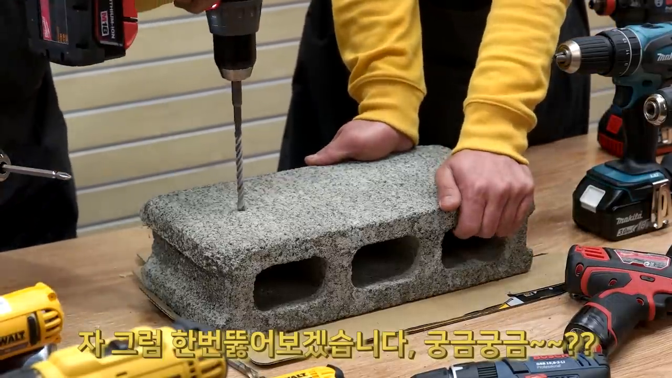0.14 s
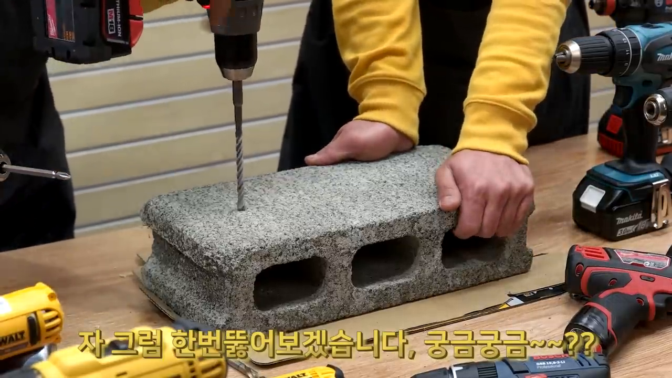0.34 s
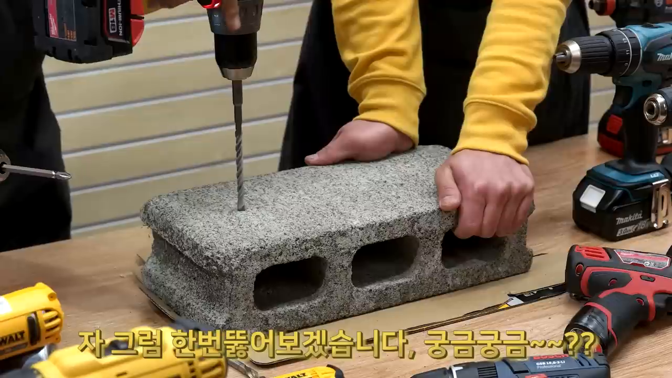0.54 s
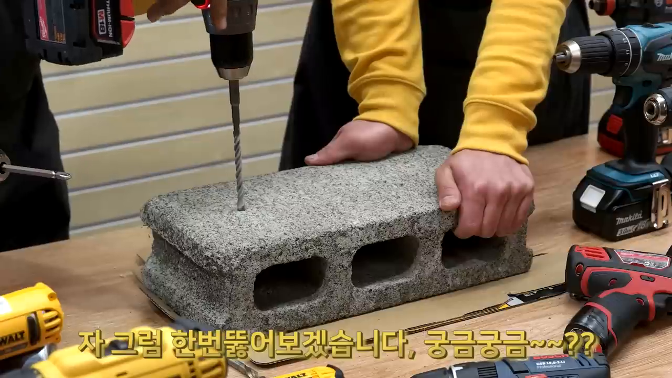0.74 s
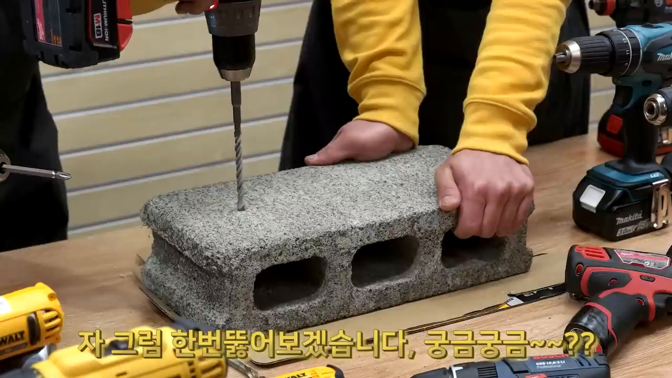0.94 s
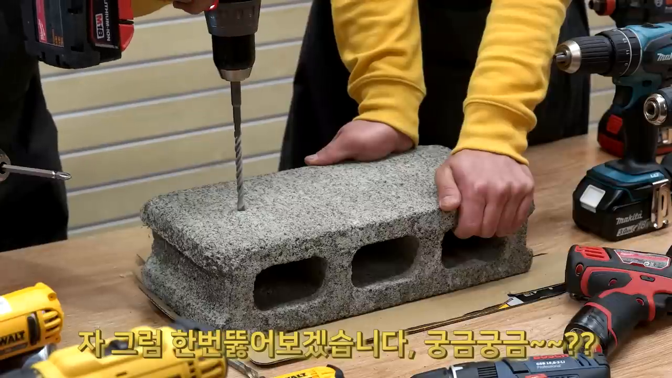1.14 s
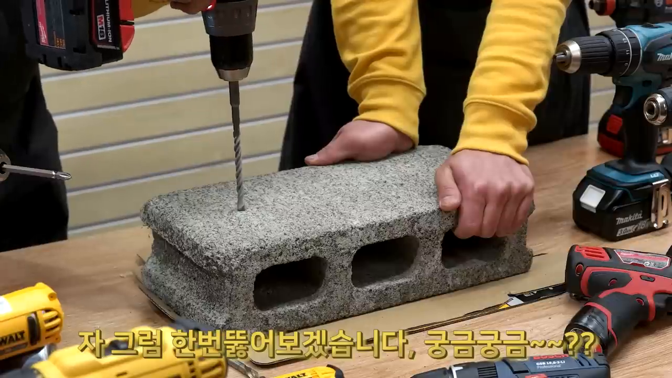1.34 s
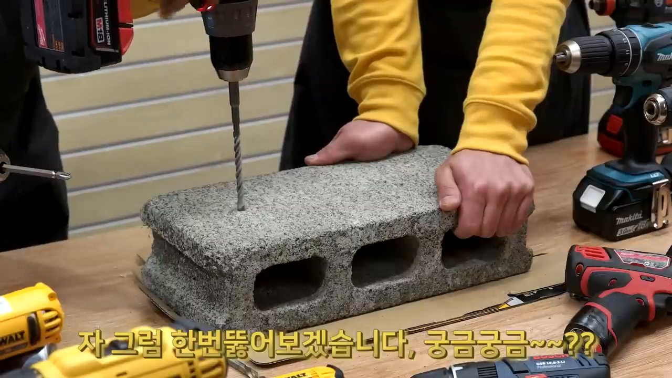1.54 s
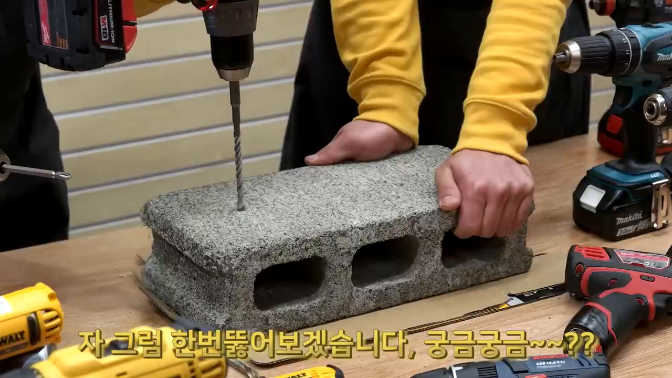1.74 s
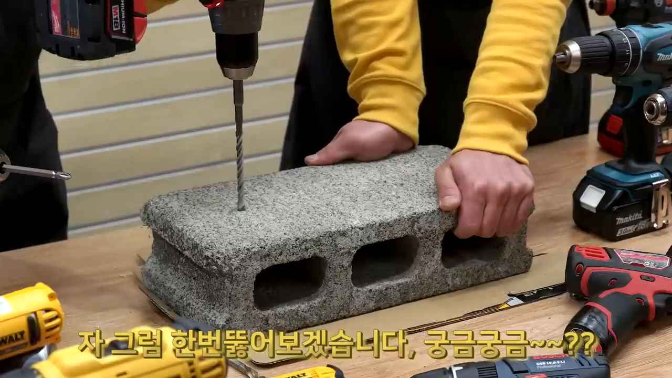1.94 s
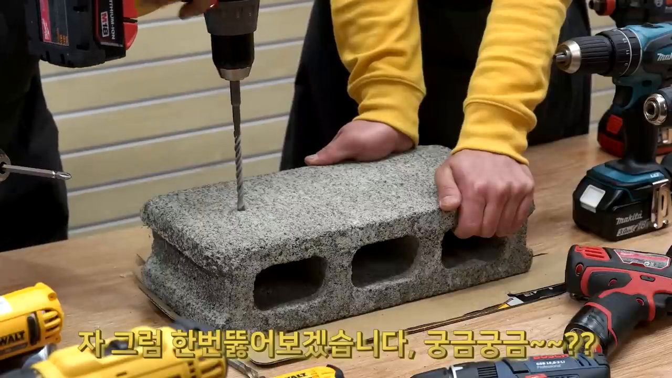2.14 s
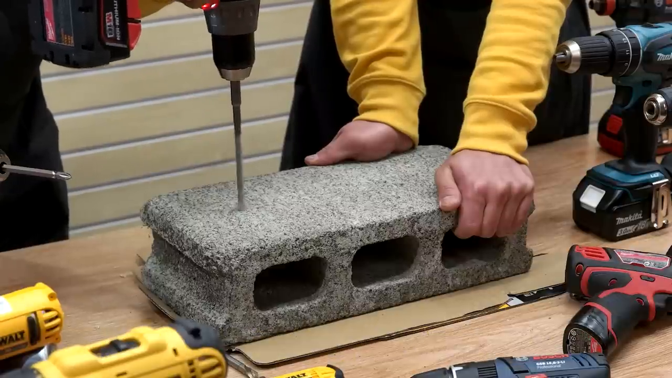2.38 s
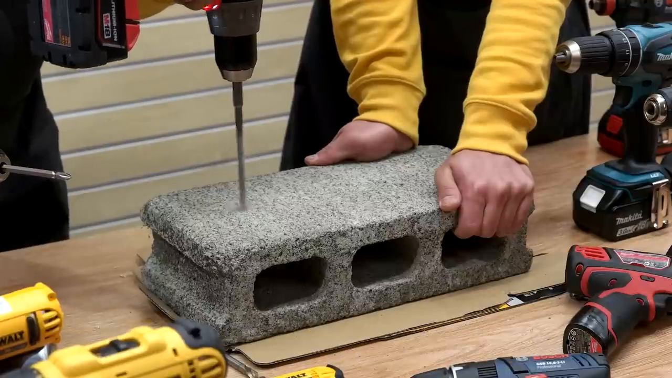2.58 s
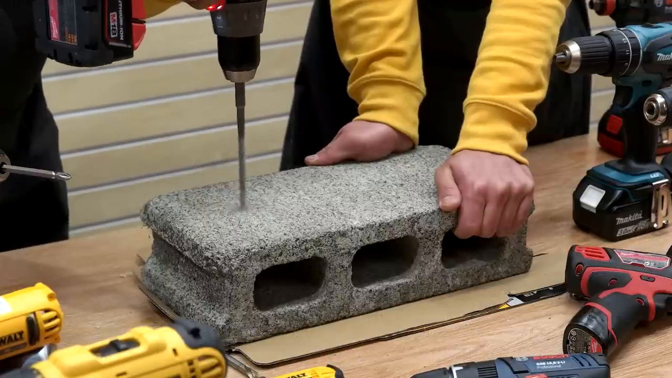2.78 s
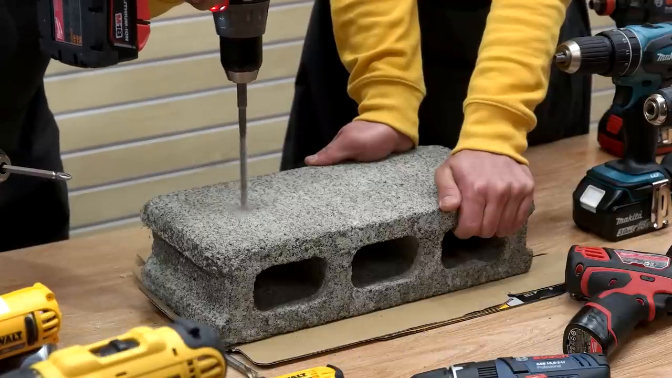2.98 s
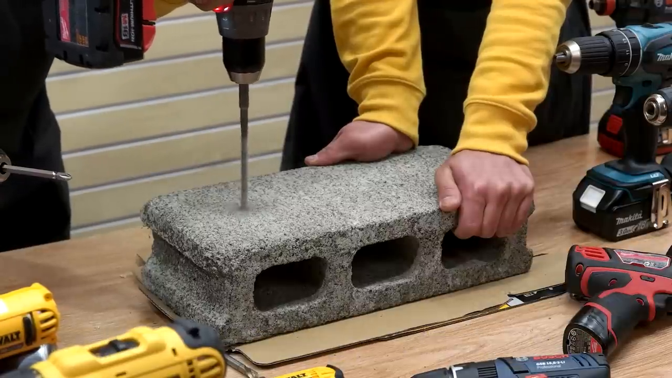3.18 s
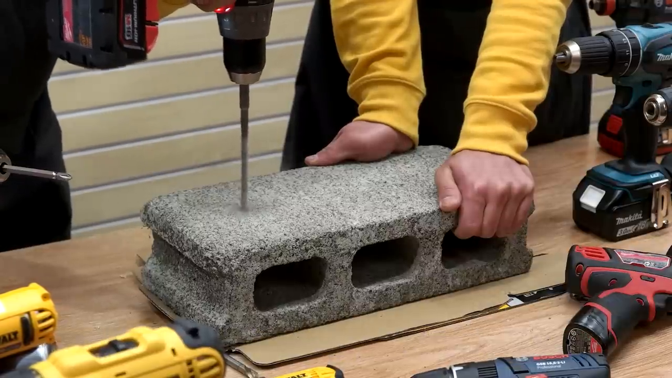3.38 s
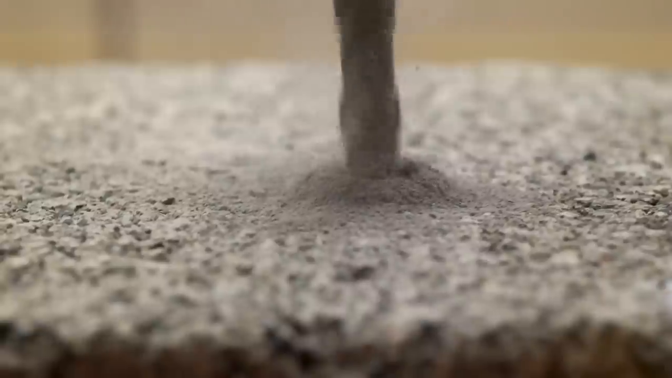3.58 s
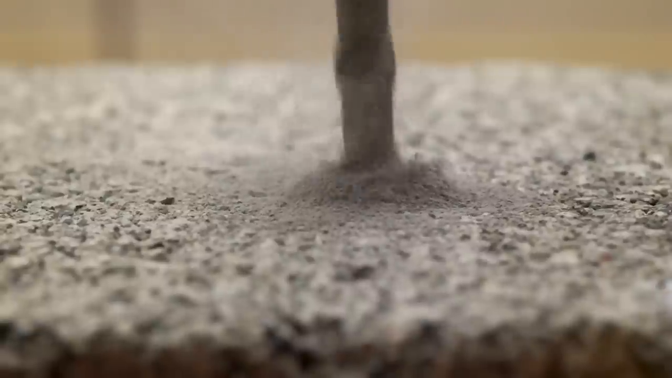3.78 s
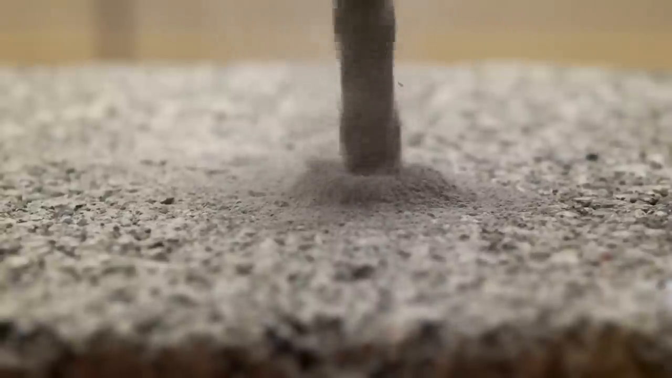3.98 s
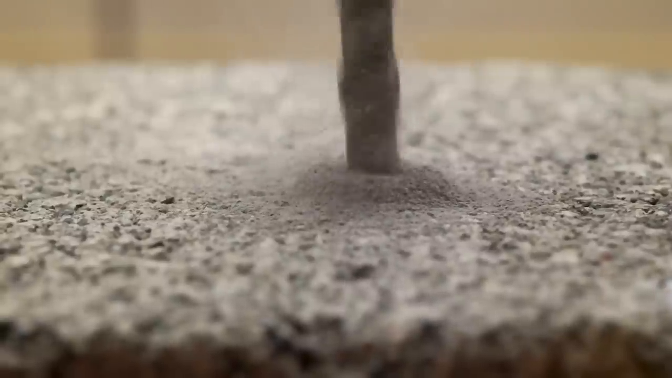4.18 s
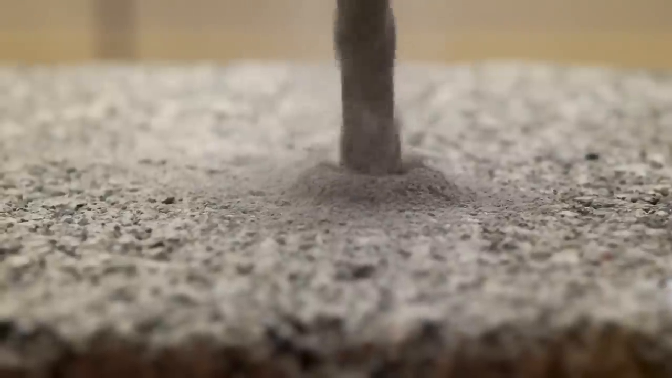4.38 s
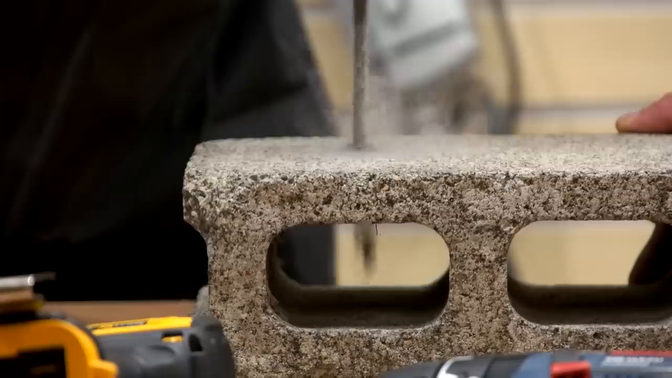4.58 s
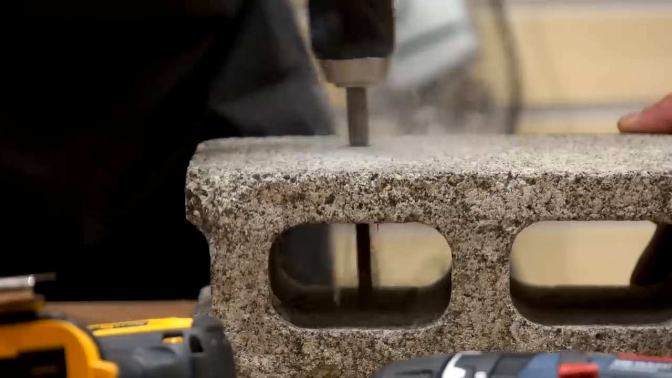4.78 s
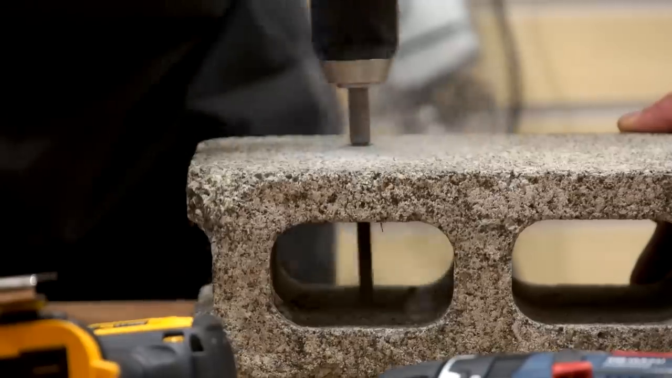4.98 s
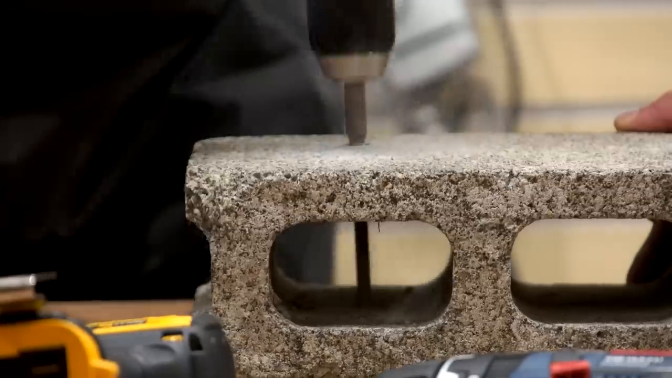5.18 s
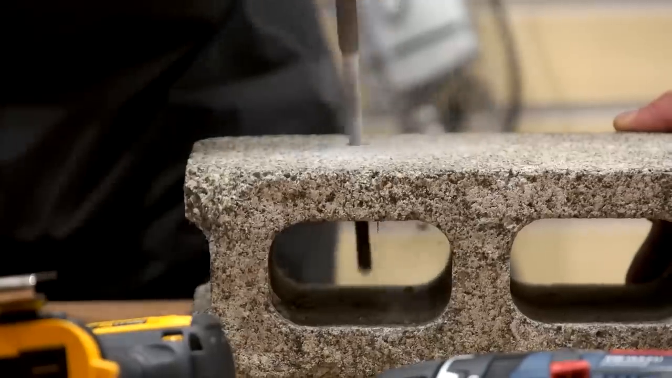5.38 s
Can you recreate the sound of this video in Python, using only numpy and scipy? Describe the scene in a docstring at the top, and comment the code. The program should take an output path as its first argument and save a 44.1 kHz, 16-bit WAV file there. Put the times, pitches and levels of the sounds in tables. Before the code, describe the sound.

A cordless hammer drill bursts into a harsh, steady buzzing grind on a concrete block, briefly changes pitch, resonates hollowly, then fades with squeaks.

```python
"""Hammer drill through a hollow concrete block

A cordless hammer drill bores into a hollow concrete block on a bench in a hard, small room.
First the room hums (shaped noise) and the bit ticks on the concrete (noise strokes through resonances).
Then the ratchet hammers and the tip grinds (blow clicks and noise ring the block) as the bench shudders,
the bit breaks through so that the cavity booms (tones locked to the blow rate), and the steel shank
squeals in the hole as it is pulled back (short wavering tones)."""
import sys
import numpy as np
from scipy import signal
from scipy.fft import rfft, irfft, next_fast_len
from scipy.io import wavfile
from scipy.ndimage import map_coordinates

SR = 44100
rng = np.random.default_rng(int(sys.argv[2]) if len(sys.argv) > 2 else 0)


def unload_audio(sound):
    """Save the sound as a 16-bit wav file, at the path given as the first command line argument."""
    columns = np.transpose(np.atleast_2d(sound))
    # keep every value between -1 and 1, then stretch to whole-number steps
    steps = np.round(np.clip(columns, -1, 1) * 32767)
    wavfile.write(sys.argv[1], SR, steps.astype(np.int16))


def gain_from_db(level_db):
    """Convert decibel levels to linear amplitude factors (20 dB per decade)."""
    decades = np.asarray(level_db, float) / 20
    return 10 ** decades


N = 239280
TIME = np.arange(N) / SR


def unit(x):
    """Scaled to rms 1."""
    return x / np.sqrt(np.mean(x ** 2) + 1e-20)


def along(points, hz):
    """Interpolates (Hz, value) points on a log frequency axis."""
    f, v = np.transpose(points)
    return np.interp(np.log(hz + 1), np.log(f + 1), v)


def curves(rows):
    """One value per sample for each column after the time."""
    s, *cols = np.transpose(rows)
    return [np.interp(TIME, s, c) for c in cols]


def during(start, end, edge):
    """1 between two times, with linear ramps of edge seconds after each."""
    return np.clip((TIME - start) / edge, 0, 1) * np.clip((end - TIME) / edge + 1, 0, 1)


def wobble(rate):
    """A smooth random curve, rate knots a second."""
    return map_coordinates(rng.standard_normal(int(N * rate / SR) + 4), [TIME * rate])


def filtered(x, response):
    """x times a complex response of frequency."""
    m = next_fast_len(N + SR // 2)
    return irfft(rfft(x, m) * response(np.fft.rfftfreq(m, 1 / SR)), m)[..., :N]


def resonant(modes):
    """The summed response of (Hz, width Hz, dB) resonances, with alternating signs."""
    def response(f):
        return sum((-1) ** k * gain_from_db(db) * 1j * f * w / (c * c - f * f + 1j * f * w)
                   for k, (c, w, db) in enumerate(modes))
    return response


def hum():
    """Distant ventilation and street rush: shaped noise, partly alike in both ears."""
    # room hum over time: time_s, level_db
    air_rows = [(0.0, -50), (0.26, -49.5), (1.31, -53.5), (1.68, -50), (2.36, -49.5)]
    # hum spectrum: pitch_hz, relative density_db per Hz
    hum_spectrum = [(15, -47), (25, -11), (55, -18), (75, -28), (107, -12.5), (147, -14.5), (209, -5),
                    (358, -6.5), (409, -4.5), (1490, -2.5), (1900, -7.5), (15400, -32)]
    # left-right likeness: pitch_hz, correlation (0-1)
    likeness = [(60, 0.76), (240, 0.9), (950, 0.67), (3770, 0.14), (15000, 0.02)]

    def mid_side(hz):
        angle = np.arccos(np.clip(along(likeness, hz), -1, 1)) / 2  # wider where the ears agree less
        return gain_from_db(along(hum_spectrum, hz)) * [np.cos(angle), np.sin(angle)]

    mid, side = filtered(rng.standard_normal((2, N)), mid_side)
    level_db = curves(air_rows)[0] + 0.9 * wobble(6)
    return gain_from_db(level_db) * unit(np.array([mid + side, mid - side]))


def ticks():
    """Each contact is a short crack and a fading scrape, coloured by the tool's resonances."""
    # ticks of bit and tool: start_s, peak_db, steel_over_plastic_db
    tick_rows = [(0.2194, -45, 6), (0.3241, -31, -25), (1.0115, -39, 1), (1.444, -31, -44),
                 (1.5594, -43, 8), (1.6262, -31, 8), (1.632, -28.5, 26), (1.722, -32, 22), (1.729, -30, 17),
                 (1.754, -22.5, 3), (1.7602, -16, -1.5), (1.789, -29, -7)]
    # what the tool rings with: pitch_hz, width_hz, level_db, steel_share (0-1)
    tool_modes = [(1370, 470, -11.5, 0), (1970, 360, -2.5, 0), (2340, 300, 2, 0.48),
                  (2960, 740, -3.5, 0.57), (4160, 1200, -3.5, 0.64), (5730, 1500, -5, 0.83),
                  (7540, 700, -1.5, 1), (9500, 2900, -12, 1)]
    rise_s, crack_t60_s = 0.0016, 0.012
    scrape_db, scrape_t60_s = -12.5, 0.074
    out, t = np.zeros(N), TIME[:SR // 4]
    f = np.fft.rfftfreq(len(t), 1 / SR)
    for s, db, steel_db in tick_rows:
        decay = gain_from_db(-60 * t / crack_t60_s) + gain_from_db(scrape_db - 60 * t / scrape_t60_s)
        stroke = (1 - np.exp(-t / rise_s)) * decay
        tool = resonant([(hz, w, level + steel * steel_db) for hz, w, level, steel in tool_modes])
        sound = irfft(rfft(stroke * rng.standard_normal(len(t))) * tool(f), len(t))
        out[round(s * SR):][:len(t)] += gain_from_db(db) * sound / np.abs(sound).max()
    return out


def grinding(cycles, turn, even_db, pressed, through):
    """Ratchet blows and crushed grit ring the block, in two bursts of grinding."""
    # grinding level, with a loud onset, a drop, a brief gap, a second burst and a fade: time_s, level_db
    grind_rows = [(2.36, -42), (2.384, -17), (2.404, -3), (2.45, -3.5), (2.548, -14), (2.6, -11.5),
                  (3.67, -10), (4.25, -11.5), (4.64, -11), (4.698, -27), (4.703, -9), (4.733, -14.5),
                  (4.75, -9), (4.82, -9.5), (4.86, -13.5), (5.012, -11.5), (5.162, -16), (5.218, -27),
                  (5.31, -26.5), (5.426, -23)]
    # what block and bit ring with: pitch_hz, width_hz, level_db
    block_modes = [(176, 53, -25.5), (602, 84, -17), (1205, 210, -11.5), (1612, 194, -2), (1829, 93, 1.5),
                   (1993, 122, -0.5), (2442, 132, -2), (2775, 107, -0.5), (3260, 380, -6),
                   (4444, 440, -11.5), (5920, 160, -9), (11900, 360, -24.5)]
    # crushed concrete: pitch_hz, relative density_db per Hz
    grit_spectrum = [(20, -55), (60, -65), (250, -27), (600, -17.5), (1050, -10.5), (1600, -6.5),
                     (2750, -2.5), (4070, -8.5), (6030, -12.5), (9000, -19), (15400, -31.5)]
    first_burst_s, second_burst_s = 2.375, 4.701
    snap_start_db, snap_fade_s = 7.5, 0.024
    block = resonant(block_modes)

    # teeth land a little early or late, some harder
    blows = np.abs(np.diff(np.floor(cycles + .018 * wobble(200)), prepend=0)) * gain_from_db(1.7 * wobble(400))
    hammering = during(2.38, 5.22, 0.019)
    gate = 1 + 0.49 * hammering * np.cos(2 * np.pi * cycles)  # grit is crushed mostly under each blow
    ring = unit(filtered(gate * rng.standard_normal(N), block))
    knocks = gain_from_db(even_db) * hammering * unit(filtered(blows, block))

    # each of the two bursts opens with a bright snap
    snap_db = sum(snap_start_db * (TIME > s) * np.exp(-np.abs(TIME - s) / snap_fade_s)
                  for s in (first_burst_s, second_burst_s))
    ground_s = np.clip(TIME - first_burst_s, 0, second_burst_s - first_burst_s)
    # the treble grows until the second burst, drops once through and rises once freed
    treble_db = 0.5 + 1.07 * ground_s + snap_db - 3.5 * through + 10 * (1 - pressed)
    grit_noise = gate * gain_from_db(1.56 * wobble(900)) * rng.standard_normal(N)
    grit = filtered(grit_noise, lambda f: gain_from_db(along(grit_spectrum, f)))
    treble = filtered(grit, lambda f: 1 / (1 + (4500 / (f + 1)) ** 4))
    grit = (grit + (gain_from_db(treble_db) - 1) * treble) / np.std(grit)

    grind_db, = curves(grind_rows)
    return gain_from_db(grind_db + turn + 0.28 * wobble(24.76)) * (gain_from_db(-2.5) * ring + gain_from_db(-2) * grit + knocks)


def bench(pressed):
    """The bench top shudders as low noise in uneven swells, with dying surges from shoves."""
    # shoves into the bench: time_s, level_db, t60_s
    jolt_rows = [(2.40, -27, 0.26), (3.2, -32.5, .6), (3.58, -31, 0.89), (3.88, -37, 4), (4.72, -26, 0.67),
                 (4.95, -35, 4)]
    # bench top spectrum: pitch_hz, relative density_db per Hz
    plank_spectrum = [(70, -68), (130, -10), (190, -9.5), (280, -1), (420, 0), (600, -11), (900, -42)]
    shoves = sum(during(s - .03, 9, 0.09) * gain_from_db(db - 60 * np.maximum(TIME - s, 0) / t60)
                 for s, db, t60 in jolt_rows)
    swells = gain_from_db(-44.5 + 2.5 * wobble(5))
    shudder = (swells + shoves) * gain_from_db(-10 * (1 - pressed) + 0.97 * wobble(18))
    return shudder * unit(filtered(rng.standard_normal(N), lambda f: gain_from_db(along(plank_spectrum, f))))


def cavity(cycles, turn, even_db, tone_db, pressed, loose):
    """The hollow sings at the blow rate and its overtones, throbbing as the bit turns out of true."""
    # overtones of the blow rate: multiple, level_db, gain_db per dB of evenness,
    # loose_db gained once the bit is loose, flicker_db
    overtone_rows = [(2, -29, 0.43, 10, 2.5), (3, -24.5, 1.07, 7, 2.5), (4, -14, 1.5, -13, 0.5)]
    run_out = 0.17 + 4.7 * loose * pressed  # held by the block, then loose in the open hole
    rattle = .5 * run_out * wobble(90)  # a loose bit blurs the overtones
    # a bit out of true splits the tone into a beating pair
    throb = (1 + run_out * turn) / np.sqrt(1 + run_out ** 2 / 2)
    tone_phase = 2 * np.pi * cycles + 0.55 * wobble(60) + 0.35 * rattle
    tone = gain_from_db(tone_db + 0.91 * wobble(45) + 1.9 * wobble(350)) * throb * np.sin(tone_phase)

    overtones = np.zeros(N)
    for k, db, grows, loose_db, flicker_db in overtone_rows:
        level_db = db + grows * even_db + loose_db * np.sqrt(loose) + flicker_db * wobble(60)
        overtones += gain_from_db(level_db) * np.sin(2 * np.pi * round(k) * cycles + 0.86 * rattle)

    # every second blow is weaker for a while: tones at 1/2 and 3/2 of the blow rate
    limp = gain_from_db(-60.5) + gain_from_db(-44) * during(3.8, 4.56, 0.086)
    half = gain_from_db(-0.5) * np.sin(np.pi * cycles + 0.81 * wobble(50))
    overtones += limp * gain_from_db(2.3 * wobble(30)) * (half + gain_from_db(5) * np.sin(3 * np.pi * cycles))

    # the overtones dip briefly around the start of the second burst, and fall once the hand lets off
    dip = during(4.66, 4.66 + 0.052, 0.016)
    overtones *= gain_from_db(-14 * dip - 11.7 * (1 - pressed))
    return np.sqrt(2) * (tone + overtones)


def drill():
    """One ratchet clock drives the grinding and cavity tones; the bench shudders on its own."""
    # ratchet: time_s, blow_rate_hz, evenness_db of the blows, cavity_tone_db
    ratchet_rows = [(2.40, 384, -4, -30), (2.57, 400, -11, -37.5), (2.65, 381, -6, -27.5),
                    (2.72, 400, -1.5, -35), (2.86, 413, -5, -33.5), (3.15, 400, -5.5, -31.5),
                    (3.3, 400, -7.5, -33), (3.78, 400, -13, -33.5), (3.84, 388, -5.5, -30.5),
                    (4.0, 390, -8.5, -34), (4.1, 387, -2.5, -39.5), (4.55, 394, -5, -37.5),
                    (4.64, 392, -5, -33), (4.70, 363, -6, -44), (4.772, 358, -9, -34),
                    (4.785, 350, -9, -14.5), (4.87, 392, -7.5, -15), (5.04, 422, -6.5, -17.5),
                    (5.15, 408, -9, -19), (5.23, 405, -14, -30.5), (5.32, 410, -28, -42)]
    rate, even_db, tone_db = curves(ratchet_rows)
    freed_s = 5.18  # the hand lets off
    pressed = during(0, freed_s, 0.037)
    through = during(4.74, freed_s, 0.013)  # the bit breaks through
    loose = during(4.86, freed_s, .12)
    cycles = np.cumsum(rate + 1.4 * wobble(40)) / SR
    turn = np.sin(2 * np.pi * cycles / 15)  # 15 blows a turn
    solid = grinding(cycles, turn, even_db, pressed, through) + bench(pressed)
    hollow = cavity(cycles, turn, even_db, tone_db, pressed, loose)
    return during(2.372, 9, 0.0049) * solid + during(2.4, 5.32, 0.04) * hollow


def wavering(hz, drift_hz, rate, octave_db):
    """A tone whose pitch wanders, with a raspier octave."""
    phase = 2 * np.pi * np.cumsum(hz + drift_hz * wobble(rate)) / SR
    return np.sqrt(2) * (np.sin(phase) + gain_from_db(octave_db) * np.sin(2 * phase + 1.2 * wobble(600)))


def squeal():
    """Stick-slip of the shank: short tones that catch and let go, fluttering as it turns."""
    # shank squeals in the hole: start_s, length_s, pitch_hz, level_db, octave_over_tone_db
    rubbed_rows = [(4.702, .06, 1985, -14, -30), (4.697, 0.038, 2377, -12.5, -30),
                   (4.798, .23, 1990, -21.5, -30), (5.145, 0.054, 5600, -22.5, -10),
                   (5.152, 0.057, 5950, -23.5, -25), (5.193, 0.086, 5490, -23, -15),
                   (5.198, 0.053, 4510, -22, -20), (5.226, 0.16, 6020, -25.5, -28),
                   (5.274, 0.02, 5900, -14, -12.5), (5.27, .025, 5440, -27, -2),
                   (5.294, .03, 4440, -30, -27), (5.304, .07, 2750, -27.5, -4),
                   (5.344, .1, 1364, -35.5, -13), (5.38, 0.037, 4490, -32, -27)]
    flutter_db = 4 * np.cos(2 * np.pi * 31.7 * (TIME - 5.28))  # the shank catches about once a turn
    out = np.zeros(N)
    for s, long, hz, db, octave_db in rubbed_rows:
        level = gain_from_db(db + flutter_db + 2.2 * wobble(60) + 2.2 * wobble(500))
        out += level * during(s, s + long, 0.0051) * wavering(hz, .007 * hz, 200, octave_db)
    return out


def room(x):
    """Direct sound plus a decaying noise tail for each ear, redrawn every eighth of a second."""
    # decay of the walls: pitch_hz, t60_s
    wall_rows = [(200, 0.28), (2000, 0.52), (10000, 0.23)]
    # room over direct sound: pitch_hz, ratio_db
    wet_rows = [(60, -2), (300, -12), (700, -6), (1300, -7), (2500, 0), (5000, 1), (12000, -0.5)]
    wet, step = np.zeros((2, N + 2 * SR)), SR // 8
    fade = np.hanning(2 * step + 1)[:-1]  # overlapping slices crossfade
    x_long = np.pad(x, (0, 2 * step))
    for start in range(0, N, step):
        hz, t, z = signal.stft(rng.standard_normal((2, SR // 3)), SR, nperseg=256)
        decay = gain_from_db(-60 * t / along(wall_rows, hz)[:, None])
        tail = signal.istft(z * decay, SR, nperseg=256)[1]
        tail = tail / np.linalg.norm(tail[0])
        part = signal.fftconvolve((fade * x_long[start:start + 2 * step])[None], tail, axes=1)
        wet[:, start + 200:start + 200 + part.shape[1]] += part  # first walls answer a few ms late

    def share(f):  # power share of the room
        return 1 / (1 + gain_from_db(-2 * along(wet_rows, f)))

    direct = filtered(x, lambda f: np.sqrt(1 - share(f)))
    return direct + filtered(wet[:, :N], lambda f: np.sqrt(share(f)))


def scene():
    """The tool on the bench, a little to the left; its small steel sounds reach the ears more directly."""
    # left louder and right softer by: pitch_hz, lean_db
    lean_rows = [(300, -0.05), (4000, 0.42), (12000, 1.2)]
    steel = squeal() + ticks()
    near = room(drill() + gain_from_db(-3.5) * steel) + gain_from_db(-12) * steel
    side = np.array([[1], [-1]])

    def lean(f):  # the left also comes 11 microseconds early, the right as much late
        return gain_from_db(along(lean_rows, f) * side) * np.exp(2j * np.pi * f * 1.1e-5 * side)

    return filtered(near, lean) + hum()


def roll_off(x):
    """The treble ends steeply here."""
    return signal.sosfilt(signal.butter(12, 15580, fs=SR, output="sos"), x)


def record(dry):
    """The input stage softly clips the loudest peaks."""
    mix = dry / (1 + np.abs(dry / 1.08) ** 8) ** (1 / 8)
    return roll_off(mix)


dry = scene()
out = record(dry)
unload_audio(out)
```